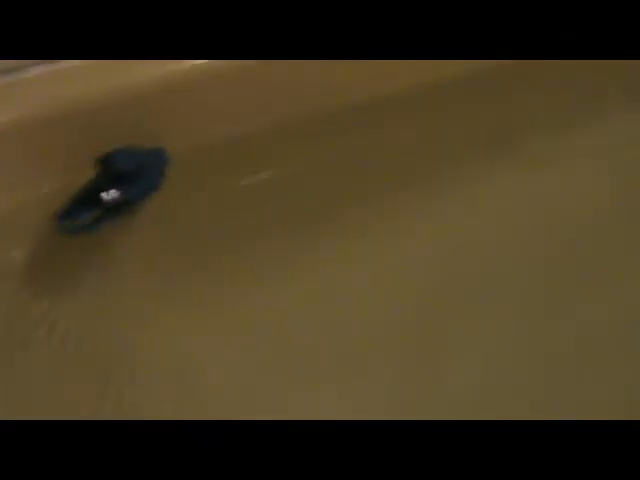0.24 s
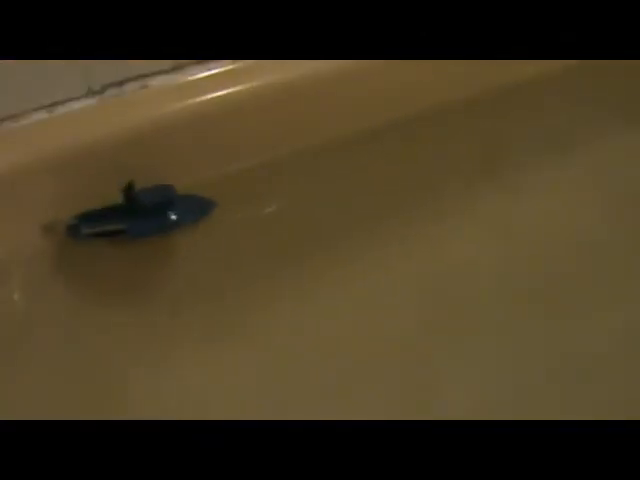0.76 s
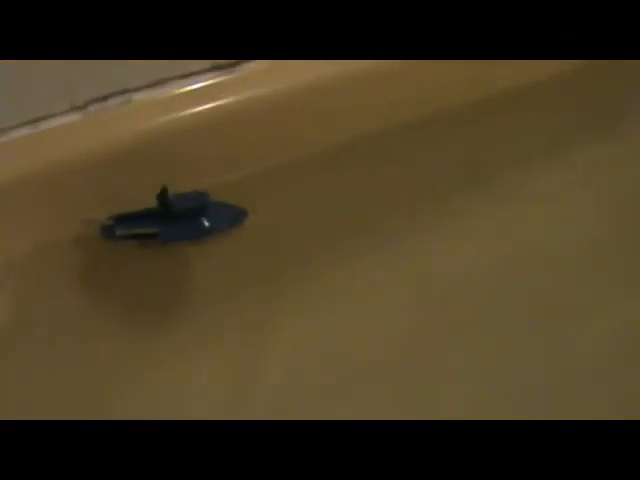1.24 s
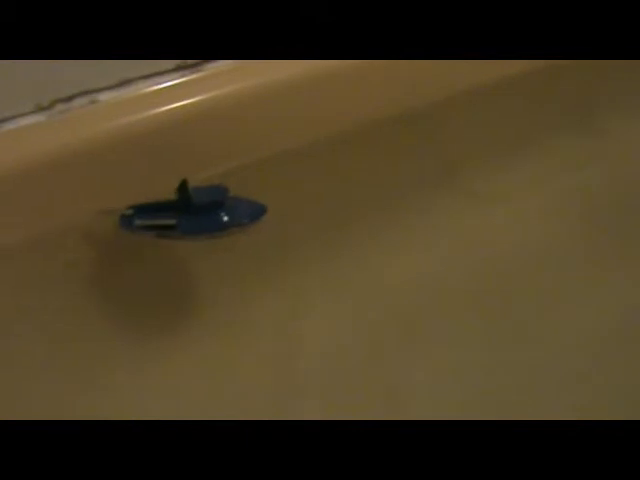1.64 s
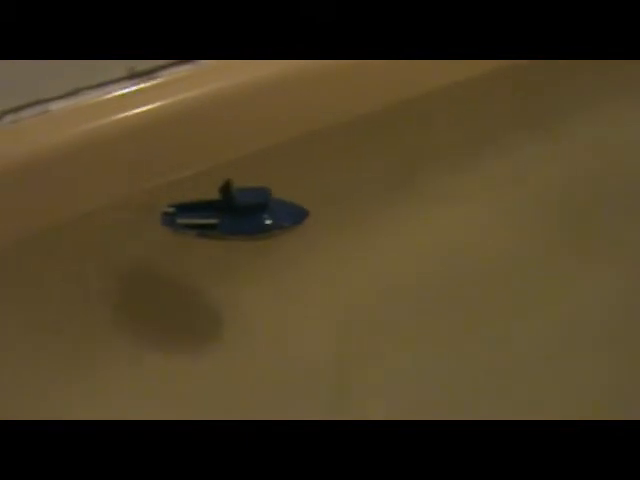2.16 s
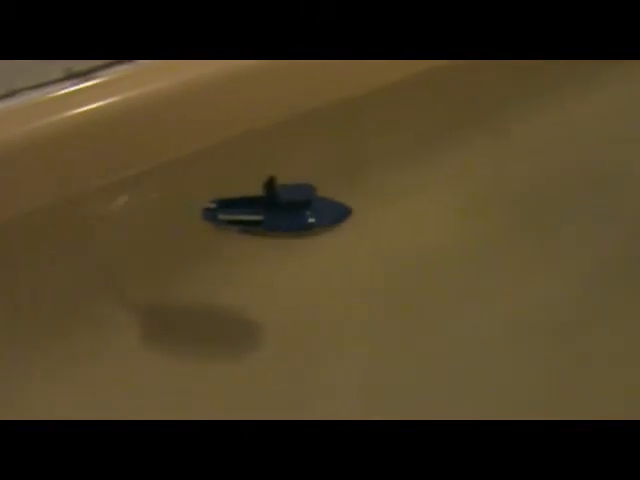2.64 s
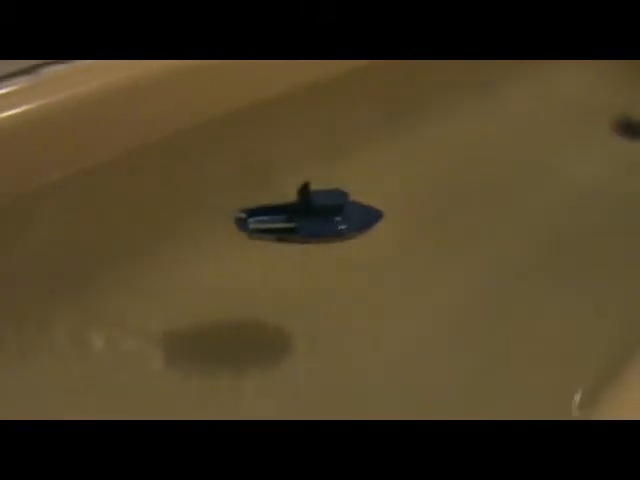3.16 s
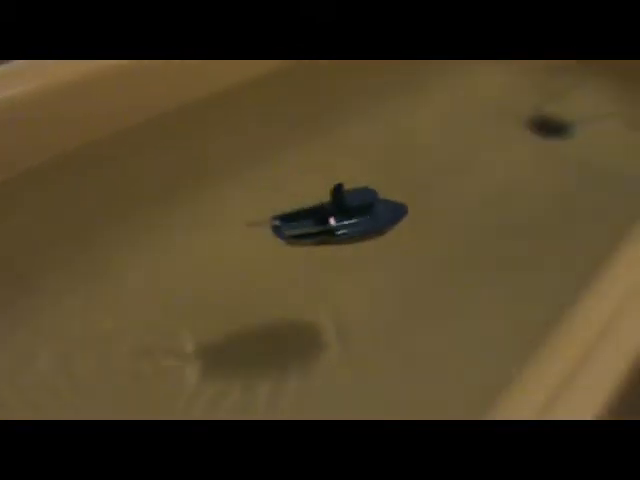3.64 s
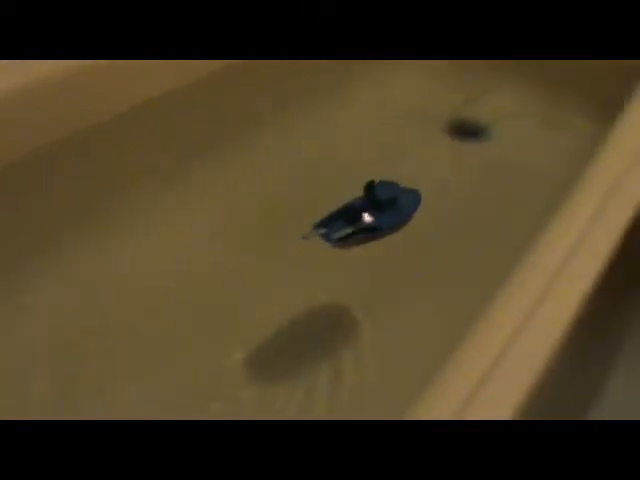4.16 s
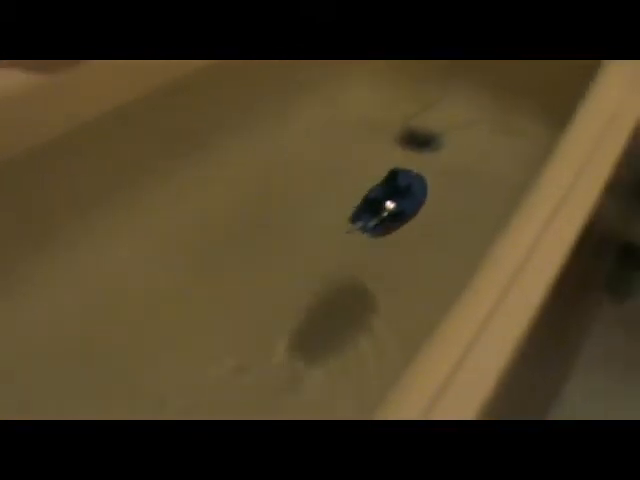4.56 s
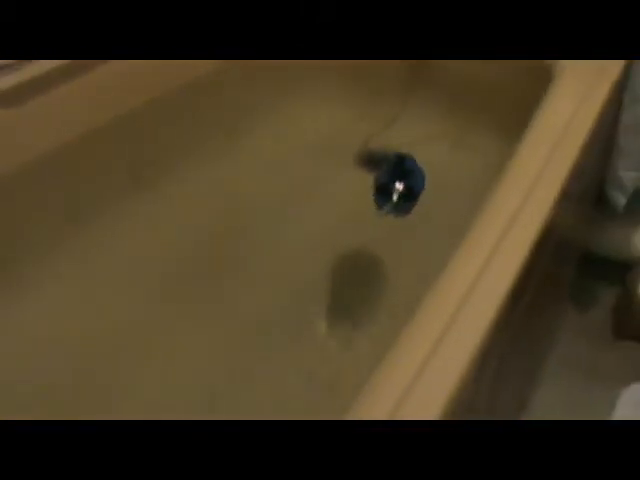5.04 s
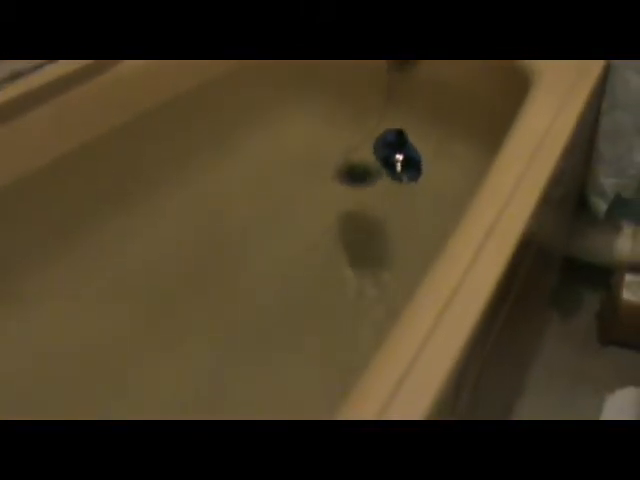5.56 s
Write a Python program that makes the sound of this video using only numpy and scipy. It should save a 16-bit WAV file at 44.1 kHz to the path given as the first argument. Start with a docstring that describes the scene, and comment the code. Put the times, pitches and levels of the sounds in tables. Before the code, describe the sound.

A tiny tin steam boat rattles steadily across a bathtub, a fast hollow, tinny popping buzz, with a soft rub and dull bumps early on.

```python
"""A toy pop-pop steam boat chugs across a bathtub in a tiled bathroom.
The thin lid of its boiler buckles out and back about 17 times a second, in several tinny snaps per stroke.
Each snap rings lid and hull with a hollow pop, a bright crackle and a short clang; tub and room smear them.
Something rubs and bumps the tub, whose wall shudders in low modes, and a few faint knocks follow.
Faint low tones and a soft flutter of short tones lie beneath; soft noise is the quiet of the room."""
import sys
import numpy as np
from scipy import signal
from scipy.fft import rfft, irfft
from scipy.io import wavfile
from scipy.ndimage import uniform_filter1d

SR = 44100
rng = np.random.default_rng(int(sys.argv[2]) if len(sys.argv) > 2 else 0)


def generate_wav(signal):
    """Clip the signal to [-1, 1] and save it as 16-bit WAV at the path in sys.argv[1]."""
    frames = np.transpose(np.atleast_2d(signal))
    scaled = np.clip(frames, -1, 1) * 32767
    pcm = np.round(scaled).astype(np.int16)
    wavfile.write(sys.argv[1], SR, pcm)


N = 255780
LEAD = SR // 2  # samples before the start: the boat is already running
TIME = np.arange(-LEAD, N) / SR  # seconds

# The snaps of the lid within one stroke, as it buckles in steps.
# Each row: place in the stroke (0-1), then relative levels in dB of pop, crackle, low clang and high clang.
LID_SNAPS = [(0, 3.5, 7.5, 5, -5), (.155, 2, 2.5, -11, -10), (.26, -7.5, 3.5, -15, -6),
             (.39, -2, -7.5, -27, -10), (.495, 4, 7, -22.5, -2.5), (.645, -0.5, -5.5, 1, -14),
             (0.705, -2, -14, -8, -43), (0.935, -4.5, -29, -36, -30)]
# Now and then the boiler falters and picks up again.
# Each row: middle in seconds, half length in seconds, strokes per second lost (below 0 it hurries).
BOILER_FALTERS = [(.2385, .3332, 1.6088), (1.0864, .2227, 1.6348), (1.6224, .2162, .8863),
                  (3.0162, .1783, .3522), (3.8284, .1678, 1.6269), (4.36, .14, -.28), (4.8, .2, .27),
                  (5.28, .1, -.2), (5.7381, .9798, .2778)]


def boat():
    """Every snap of the lid gives a hollow pop and, just after it, a bright crackle and a tinny clang."""
    times = snap_times(wander_s=.0004, jitter_s=.00005)
    pop_db, crackle_db, *clang_db = snap_levels(times)
    pop_lead_s = 0.0015
    pop = pops(times - pop_lead_s, pop_db)
    tinny = crackles(times, crackle_db) + clangs(times, clang_db)
    # fixed offsets in dB for the left and the right ear
    both = pop * from_db([[-.3], [.3]]) + tinny * from_db([[.3], [-.1]])
    # on top of them the boat drifts slightly from left to right
    drift_db_per_s = -0.1  # left minus right
    pan_db = drift_db_per_s * TIME * np.array([[.5], [-.5]])
    return from_db(pan_db) * both


def strokes_done():
    """Running count of the boiler's strokes; whole numbers are main snaps."""
    steady_strokes_per_s = 17.7548
    main_snap_s = .0039  # a main snap falls here
    strokes = np.cumsum(steady_strokes_per_s - swells(BOILER_FALTERS)) / SR
    return strokes - np.interp(main_snap_s, TIME, strokes)


def snap_times(wander_s, jitter_s):
    """Times of all snaps, strokes x snaps; the lesser ones slowly shift against the main snap."""
    strokes = strokes_done()
    whole = np.arange(np.ceil(strokes[0]), strokes[-1])[:, None]
    place = np.array(LID_SNAPS)[:, 0]
    # the return snap, half way, comes a little late, and later still in a slow stroke
    late = .008 + .011 * np.interp(whole, strokes, swells(BOILER_FALTERS))  # in strokes
    position = whole + place + late * np.sin(np.pi * place)
    times = np.interp(position, strokes, TIME, right=np.inf)
    wander = slow_change(times.shape, size=18)
    return times + wander_s * wander * (place > 0) + jitter_s * rng.standard_normal(times.shape)


def snap_levels(times):
    """Pop, crackle, low clang and high clang level of every snap, as the lid flips cleanly or in many steps."""
    # How the lid's play changes. Each row: time in seconds, then dB added to the main pop,
    # to the return pop, to the pops in between and to the crackle in between.
    lid_play = [(0, 4, -7, 5, -2), (.6, -12, -6, -7.5, 1.5), (1.15, 5, 3.5, 1, 1.5), (1.9, -3, 0, 5, -5.5),
                (2.6, 7, 7, 4.5, 1), (3.25, -5, -1.5, -6.5, -0.5), (3.9, -2, 1.5, 0.5, -5),
                (4.35, 1.5, 3.5, -2, 2), (5.0, -3, -2.5, -10.5, -2.5), (5.8, -5, -4, 0, 3.5)]
    place, pop_db, crackle_db, low_db, high_db = np.transpose(LID_SNAPS)
    s, *columns = np.transpose(lid_play)
    main_db, back_db, step_db, step_crackle_db = [np.interp(times, s, c) for c in columns]
    main = np.arange(len(place)) == 0
    back = abs(place - .5) < .05
    between = ~(main | back)
    force_db = .8 * rng.standard_normal(times.shape)  # a stronger snap is louder in all its parts
    pop_db = pop_db + main * main_db + back * back_db + between * step_db
    crackle_db = crackle_db + between * step_crackle_db
    return [db + force_db for db in (pop_db, crackle_db, low_db, high_db)]


def pops(times, level_db):
    """The snaps ring three resonances of lid and hull, each with its own strength; the main one glides."""
    # Hollow colour of lid and hull. Each row: pitch in Hz, level in dB.
    pop_slope = [(80, -29), (330, -60), (450, -34), (600, -29), (730, -6.5), (950, -6), (1150, 0.5),
                 (1400, 1.5), (1650, 2), (2000, -6), (2250, -7), (3000, -34.5), (5000, -37)]
    # The lid's main ring as the boat moves through the tub.
    # Each row: time in seconds, resonance in Hz, its width in Hz, direct sound of the pops in dB.
    voyage = [(0, 1530, 422, -7), (1.3, 1590, 405, -5), (1.7, 1560, 181, -4.5), (2.2, 1463, 132, 1),
              (2.7, 1446, 150, 0), (3.0, 1360, 308, -10), (3.45, 1550, 254, -1.5), (3.9, 1580, 340, -5),
              (4.3, 1340, 340, -0.5), (5.0, 1450, 297, -5), (5.8, 1380, 300, -3)]
    # Strength of the three rings, before their trims below.
    # Each row: time in seconds, main ring in dB, upper ring in dB, low hollow ring in dB.
    ring_levels = [(0, -38.5, -31, -44.5), (.3, -32, -34.5, -41.5), (.9, -36, -32, -42.5),
                   (1.35, -34.5, -31, -43), (1.85, -30.5, -41, -40.5), (2.3, -31.5, -49, -44),
                   (2.7, -32, -52, -55), (3.0, -35.5, -30.5, -55), (3.3, -34.5, -44, -49),
                   (3.46, -34.5, -31, -42), (3.6, -34, -45, -40), (3.95, -32.5, -33, -42),
                   (4.35, -36, -31, -41), (4.8, -34.5, -32, -58), (5.3, -35, -35.5, -56),
                   (5.8, -34.5, -31, -49)]
    main_trim_db, upper_trim_db, hollow_trim_db = 2, -2, -4.5
    upper_lag_s = 0.002507  # the upper ring answers a little after the main one, so that the two alternate

    hz, width_hz, direct_db = in_time(voyage)
    # steam tightens the lid and raises its pitch in every stroke
    swing, tightest_at = 0.2, 0.02  # in widths of the resonance; place in the stroke (0-1)
    hz = hz + swing * width_hz * np.cos(2 * np.pi * (strokes_done() - tightest_at))
    # both pitches also wander by chance
    main_wander, upper_wander = slow_change((len(TIME), 2), size=900).T
    hz = hz + .18 * width_hz * main_wander
    upper_centre_hz = 1885
    upper_hz = upper_centre_hz + 90 * upper_wander

    main, upper, hollow = [
        disperse(clicks(times + lag, level_db, spread_db=.9), hz=1600, width_hz=260)
        for lag in (0, upper_lag_s, 0)]
    main_ring = moving_resonance(main, hz, width_hz)
    upper_band = resonance(upper, upper_centre_hz, width_hz=460)
    upper_ring = moving_resonance(upper_band, upper_hz, np.full(len(TIME), 115.0))  # width in Hz
    hollow_ring = resonance(hollow, hz=730, width_hz=343)

    main_db, upper_db, hollow_db = in_time(ring_levels)
    rings = [(main_ring, main_db + main_trim_db),
             (upper_ring, upper_db + upper_trim_db),
             (hollow_ring, hollow_db + hollow_trim_db)]
    out = 0
    for ring, db in rings:
        heard = bathroom(colour(ring, pop_slope), direct_db, tub_db=-5, tub_t60=.025,
                         room_db=-2.5, room_t60=.4, side_db=-7, count=20)
        out = out + steady(heard) * from_db(db)
    return out


def crackles(times, level_db):
    """Bright creasing of the tin boiler, with modes that ring out now and then."""
    # Crinkling metal. Each row: pitch in Hz, level in dB.
    crackle_slope = [(150, -103), (500, -39), (950, -3), (2000, 2), (2800, -2.5), (3600, 0), (4650, -9),
                     (5800, -4.5), (7000, -1), (9000, -2.5), (9900, -12), (11200, -4.5), (11900, -14),
                     (13000, -17.5), (15000, -32)]
    # Resonances of the tin boiler. Each row: pitch in Hz, width in Hz, peak in dB.
    tin_modes = [(4156, 840, 6), (5017, 390, 10.5), (5457, 500, 9), (6330, 500, 5), (9320, 430, 6.5),
                 (10370, 240, 9), (12850, 300, 11)]
    # Single tin modes that ring out for a while.
    # Each row: middle in seconds, half length in seconds, pitch in Hz, level in dB.
    ringing_modes = [(0.742, 0.089, 2520, -44), (3.54, 0.06, 3500, -38), (3.996, 0.22, 5490, -36)]
    direct_db = -4.5 - 0.39 * TIME  # the direct sound fades against its echoes as the boat sails away
    dry = colour(crinkle(times, level_db, length_s=0.0009, grit_db=14.0), crackle_slope, tin_modes)
    heard = bathroom(dry, direct_db, tub_db=2, tub_t60=0.047,
                     room_db=4, room_t60=0.88, side_db=-7.5, count=26)
    # the crackle weakens by 1 dB for each stroke per second that the boiler loses
    out = steady(heard) * from_db(-27.5 - 1 * swells(BOILER_FALTERS))
    for s, length, hz, db in ringing_modes:
        ring = steady(resonance(heard, hz, width_hz=250))
        out = out + ring * swells([(s, length, from_db(db))])
    return out


def clangs(times, levels_db):
    """Each snap rings two tin modes for a few milliseconds; their pitch sinks as the lid relaxes."""
    # The two tin modes. Each row: starting pitch in Hz, fall in Hz per second.
    clang_modes = [(4120, 30000), (5520, 60000)]
    # How strongly they clang. Each row: time in seconds, low clang in dB, high clang in dB.
    clang_levels = [(0, -48, -39), (1.2, -42.5, -46.5), (2.2, -43, -35.5), (3.1, -37.5, -36),
                    (3.7, -52, -38.5), (4.3, -53, -35.5), (4.9, -39, -39.5), (5.8, -38, -39)]
    rise_s = .0013  # the ring is strongest after this time
    t = np.arange(LEAD // 25) / SR
    swell = t / rise_s * np.exp(-t / rise_s)
    out = 0
    for (hz, fall), snap_db, db in zip(clang_modes, levels_db, in_time(clang_levels)):
        ring = swell * np.sin(2 * np.pi * (hz - fall * t / 2) * t)
        dry = signal.oaconvolve(clicks(times, snap_db, spread_db=2.0), ring)[None, :len(TIME)]
        heard = bathroom(dry, 0, tub_db=-8, tub_t60=.03, room_db=-4, room_t60=.4, side_db=-6, count=14)
        out = out + steady(heard) * from_db(db)
    return out


def clicks(times, level_db, spread_db):
    """One click per snap, each of a slightly different strength."""
    sizes = from_db(level_db + spread_db * rng.standard_normal(times.shape))
    inside = (times > TIME[0]) & (times < TIME[-1])
    out = np.zeros(len(TIME))
    out[(times[inside] * SR).astype(int) + LEAD] = sizes[inside]
    return out


def crinkle(times, level_db, length_s, grit_db):
    """Each snap sets off a brief spray of tiny creases, which changes a little with every stroke."""
    t = np.arange(LEAD // 40) / SR
    energy = t * np.exp(-t / length_s)
    grit = slow_change(times.shape + t.shape, size=2)
    sprays = from_db(grit_db) * np.sqrt(energy / energy.sum()) * grit
    sprays[..., 0] += 1  # the snap itself
    inside = (times > TIME[0]) & (times < TIME[-1])
    out = np.zeros(len(TIME) + len(t))
    for s, db, spray in zip(times[inside], level_db[inside], sprays[inside]):
        start = int(s * SR) + LEAD
        out[start:start + len(t)] += from_db(db) * spray
    return out[:len(TIME)]


def disperse(x, hz, width_hz):
    """Bending waves in thin tin arrive pitch by pitch, which stretches a click into a short burst."""
    r = np.exp(-np.pi * width_hz / SR)
    poles = [1, -2 * r * np.cos(2 * np.pi * hz / SR), r * r]
    return signal.lfilter(poles[::-1], poles, x)  # all-pass: it only delays


def bathroom(x, direct_db, tub_db, tub_t60, room_db, room_t60, side_db, count=10):
    """Direct sound, quick echoes in the tub and the room's tail; the echoes change as the boat travels."""
    t = np.arange(LEAD) / SR
    room_rise_s = 0.0096  # the room's answer takes this long to build up
    tub = from_db(tub_db - 60 * t / tub_t60) / np.sqrt(tub_t60) * (t > .0005)
    room = from_db(room_db - 60 * t / room_t60) / np.sqrt(room_t60)
    room = room * np.minimum(t / room_rise_s, 1) ** 2
    decay = np.hypot(tub, room) * np.sqrt(np.log(10 ** 6) / SR)
    out = np.zeros((2, len(TIME) + LEAD))
    out[:, :len(TIME)] = x * from_db(direct_db)
    # blend from each of the boat's places to the next, each with echoes of its own
    place = np.linspace(0, count - 1, len(TIME))
    for k in range(count):
        near = np.flatnonzero(abs(place - k) < 1)
        part = x[:, near] * np.cos(np.pi / 2 * (place[near] - k))
        echoes = signal.fftconvolve(part, decay * stereo_noise(LEAD, side_db), axes=1)
        out[:, near[0]:near[0] + echoes.shape[1]] += echoes
    return out[:, :len(TIME)]


def rub_force():
    """Something rubs roughly along the tub: the force swells, fades slowly and stops."""
    # One row: start in seconds, end in seconds, level in dB.
    rub_span = (0.21, 0.6, -35.5)
    start, end, rub_db = rub_span
    rise_s, fade_db_per_s, stop_s, rough_db = .05, 51, 0.012, 2.5
    force = from_db(rub_db - fade_db_per_s * (TIME - start)) * np.clip((TIME - start) / rise_s, 0, 1)
    force = force * from_db(rough_db * slow_change(TIME.shape, size=500))
    return force * np.exp(-np.maximum(TIME - end, 0) / stop_s)


def knocks():
    """A rub and dull, soft blows set the wall of the tub shuddering in its low modes."""
    # Each row: start in seconds, level in dB, length of the shudder in seconds.
    blows = [(0.238, -39, 0.01), (.288, -31, 0.018), (0.325, -32.5, 0.024), (.405, -39, .02),
             (0.51, -42, 0.015), (0.734, -45.5, 0.011), (.8, -44.5, 0.019), (1.285, -52, 0.06),
             (1.779, -46, 0.018), (2.238, -45, 0.0083), (4.769, -50, 0.0051), (5.11, -51, 0.0059)]
    # Dull colour of the tub. Each row: pitch in Hz, level in dB.
    tub_slope = [(30, -14), (60, -9), (110, -1), (250, 8), (480, 2.5), (620, -7), (800, -4), (2000, -34),
                 (6000, -72)]
    # Tub modes on that slope. Each row: pitch in Hz, width in Hz, peak in dB.
    tub_modes = [(140, 20, 9), (218, 33, 8.5), (266, 15, 7.5), (293, 16, 5), (410, 21, 12.5),
                 (472, 28, 9.5), (797, 48, 15)]
    force = rub_force()
    rise_s = .004
    for s, db, length in blows:
        since = np.maximum(TIME - s, 0)
        blow = from_db(db) * (1 - np.exp(-since / rise_s)) * np.exp(-since / length)
        force = np.hypot(force, blow)
    shudder = stereo_noise(len(TIME), side_db=-8)
    # the tub colours the shudder but leaves its overall level as it was
    return rms_one(colour(force * shudder, tub_slope, tub_modes)) * np.sqrt(np.mean(force ** 2))


def low_tones(low_hz, high_hz, length_s, spread_db):
    """Soft, low, faint tones at uneven times, some set in a table and some random."""
    # The tones set by hand. Each row: middle in seconds, pitch in Hz, level in dB.
    clear_tones = [(.13, 272, -51), (.825, 140, -64), (1.015, 130, -55), (1.155, 136, -56.5),
                   (1.295, 105, -57), (1.535, 116, -54), (1.81, 107, -61), (1.89, 100, -58),
                   (2.0, 105, -60), (2.15, 140, -60), (2.275, 90, -55), (2.37, 95, -58), (2.45, 129, -57),
                   (2.553, 95.5, -57), (2.639, 252, -59), (2.7, 275, -59), (2.805, 212, -53),
                   (2.86, 263, -53), (3.145, 247, -56), (3.265, 210, -59), (3.47, 95, -56),
                   (3.63, 247, -59), (3.95, 174, -59), (4.24, 246, -61), (4.34, 250, -56), (4.65, 220, -57),
                   (4.7, 256, -55), (5.05, 263, -57), (5.45, 254, -64), (4.93, 140, -55), (5.6, 121, -59)]
    # The random tones come more densely at these times.
    # Each row: middle in seconds, half length in seconds, added tones per second.
    denser_spells = [(.7, 0.26, 45.3), (1.3, 0.31, 35), (2.05, 0.25, 65), (5.1, 0.52, 43.6)]
    base_tones_per_s, random_db = .3, -62
    due = np.cumsum(np.maximum(base_tones_per_s + swells(denser_spells), 0)) / SR  # running count of tones
    random_tones = []
    for k, (when, pitch, size) in enumerate(rng.random((int(due[-1]), 3))):
        s = np.interp(k + when, due, TIME)
        random_tones.append((s, low_hz + (high_hz - low_hz) * pitch, random_db + spread_db * (size - .5)))
    return blips(clear_tones + random_tones, length_s)


def flutter(spread_db):
    """A faint flutter of short random tones, 455-754 Hz."""
    # Each row: time in seconds, level of the flutter in dB.
    flutter_levels = [(0, -55), (.7, -54.5), (1.4, -58), (2.1, -57.5), (2.6, -72), (3.3, -69), (3.8, -59),
                      (4.4, -56.5), (5.1, -55), (5.8, -60)]
    per_s, low_hz, high_hz = 70, 455, 754
    level_db, = in_time(flutter_levels)
    grains = []
    for k, (when, pitch, size) in enumerate(rng.random((int(per_s * N / SR), 3))):
        grains.append(((k + when) / per_s, low_hz + (high_hz - low_hz) * pitch, spread_db * (size - .5)))
    return rms_one(blips(grains, length_s=0.0071)) * from_db(level_db)


def blips(rows, length_s):
    """Soft tones of a few cycles, one for each row of (s, Hz, dB), scattered between the ears."""
    t = np.arange(-LEAD // 10, LEAD // 10) / SR
    out = np.zeros((2, len(TIME) + LEAD))
    swell = np.exp(-(t / length_s) ** 2)
    for (s, hz, db), (pan, turn) in zip(rows, rng.standard_normal((len(rows), 2))):
        start = max(int((s + t[0]) * SR) + LEAD, 0)
        tone = swell * np.sin(2 * np.pi * (hz * t + turn))
        out[:, start:start + len(t)] += from_db(db + pan * np.array([[2], [-2]])) * tone
    return out[:, :len(TIME)]


def quiet_room():
    """The faint background: steady noise, separate in each ear, coloured by a smooth slope."""
    # Each row: pitch in Hz, level in dB.
    quiet_slope = [(30, -26), (100, -22), (240, -12), (400, 15), (1000, 8), (8000, -32)]
    noise = colour(rng.standard_normal((2, len(TIME))), quiet_slope)
    return from_db(-83) * rms_one(noise)


def from_db(db):
    """Decibels to gain."""
    return 10 ** (np.asarray(db) / 20)


def rms_one(x):
    """Scale to rms 1."""
    return x / np.sqrt(np.mean(x ** 2) + 1e-20)


def steady(x):
    """Even out each channel's level over a few strokes; rms 1."""
    return x / np.sqrt(uniform_filter1d(x ** 2, int(.23 * SR)) + 1e-12)


def in_time(rows):
    """Each column of a curve, read at every sample."""
    s, *columns = np.transpose(rows)
    return [np.interp(TIME, s, c) for c in columns]


def swells(rows):
    """Sum of smooth rises and falls, one for each row of (time, half length, height)."""
    return sum(height * np.exp(-((TIME - s) / length) ** 2) for s, length, height in rows)


def slow_change(shape, size):
    """Chance values that change smoothly along the first axis (strokes or samples); rms 1."""
    noise = rng.standard_normal(shape)
    for _ in range(2):
        noise = uniform_filter1d(noise, size=size, axis=0, mode="wrap")
    return rms_one(noise)


def stereo_noise(length, side_db):
    """Noise that is partly alike in both ears."""
    mid, side = rng.standard_normal((2, length))
    return rms_one(mid + from_db(side_db) * side * [[1], [-1]])


def colour(x, slope, modes=(), size=16384):
    """Causal (minimum-phase) filter: a smooth spectrum with resonance peaks on it."""
    hz = np.arange(size // 2 + 1) * SR / size
    knots, levels = np.transpose(slope)
    db = np.interp(np.log(hz + 1), np.log(knots), levels)
    for centre, width, peak_db in modes:
        db = db + peak_db / (1 + (2 * (hz - centre) / width) ** 2)
    # fold the cepstrum forward in time, so that nothing sounds ahead of its cause
    cepstrum = irfft(np.log(from_db(db)))
    cepstrum[1:size // 2] *= 2
    cepstrum[size // 2 + 1:] = 0
    response = irfft(np.exp(rfft(cepstrum)))
    return signal.fftconvolve(np.atleast_2d(x), response[None], axes=1)[:, :x.shape[-1]]


def resonance(x, hz, width_hz):
    """A fixed resonance with steep skirts."""
    band = [hz - width_hz / 2, hz + width_hz / 2]
    return signal.sosfilt(signal.butter(2, band, "band", fs=SR, output="sos"), x)


def moving_resonance(x, hz, width_hz, size=256):
    """One resonance whose centre and width glide, stepped in blocks."""
    radius = np.exp(-np.pi * width_hz / SR)
    out, state = np.zeros(len(x)), np.zeros(2)
    for i in range(0, len(x), size):
        r = radius[i]
        poles = [1, -2 * r * np.cos(2 * np.pi * hz[i] / SR), r * r]
        out[i:i + size], state = signal.lfilter([1, 0, -1], poles, x[i:i + size], zi=state)
    return out


def scene():
    """Boat, knocks, faint low tones, a soft flutter and the quiet of the bathroom."""
    faint_tones = low_tones(low_hz=180, high_hz=430, length_s=.009, spread_db=7) + flutter(spread_db=17.5)
    return (boat() + knocks() + faint_tones + quiet_room())[:, LEAD:]


def record(dry):
    """The top is cut steeply above 15 kHz."""
    return signal.sosfilt(signal.ellip(10, .1, 90, 15000, fs=SR, output="sos"), dry)


dry = scene()
out = record(dry)
generate_wav(out)
```